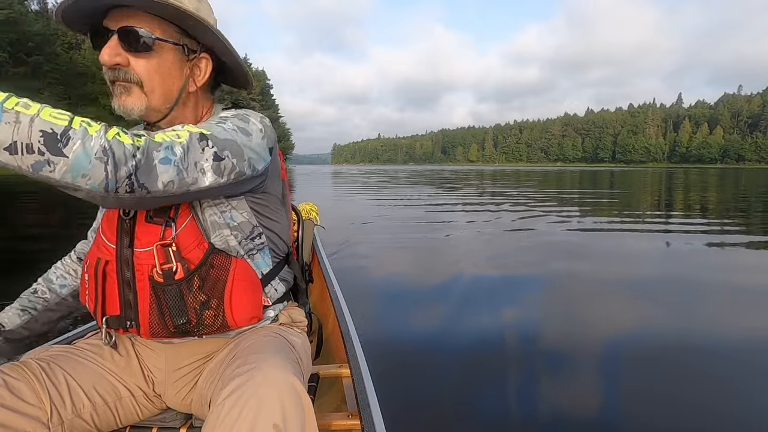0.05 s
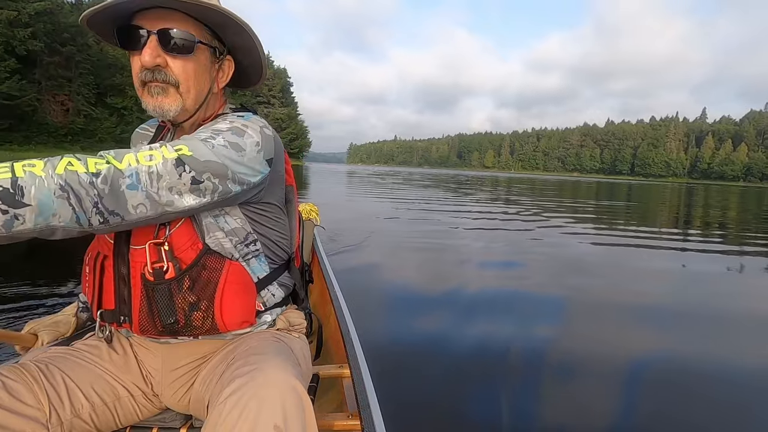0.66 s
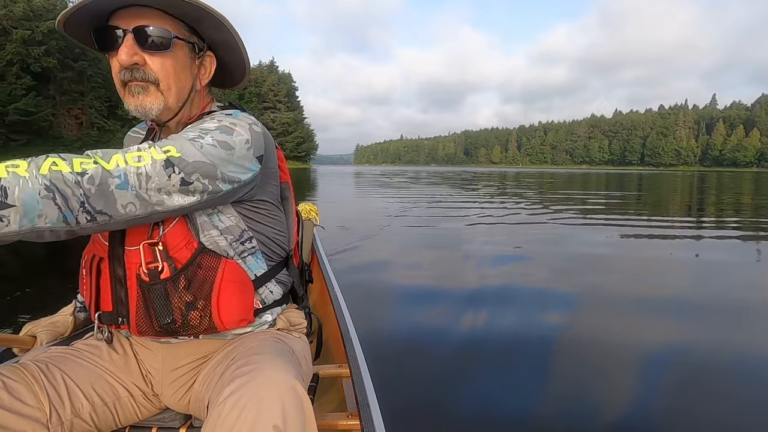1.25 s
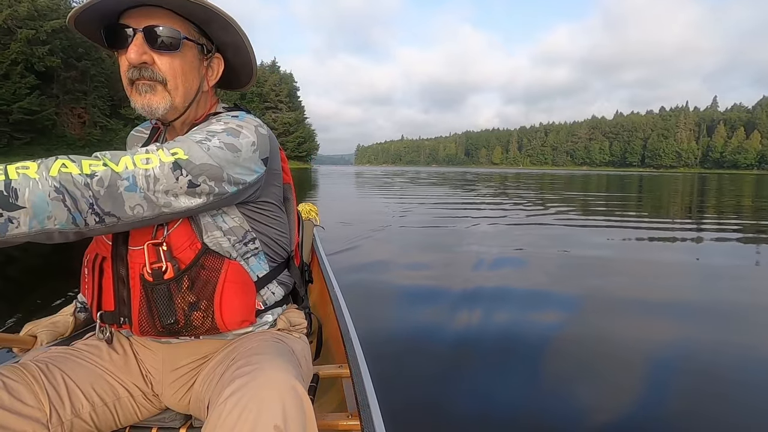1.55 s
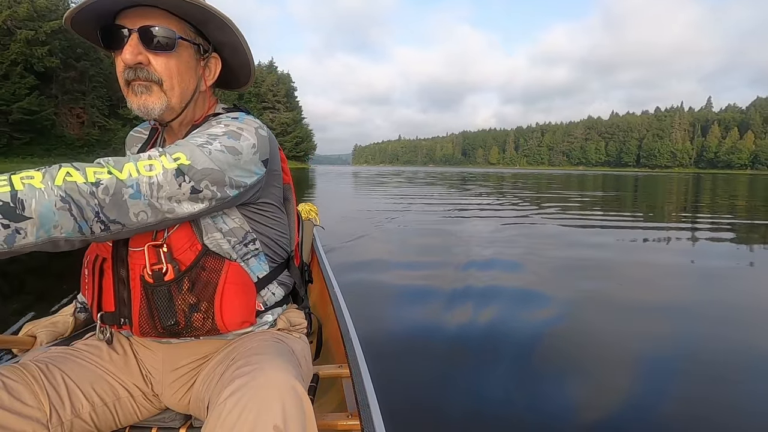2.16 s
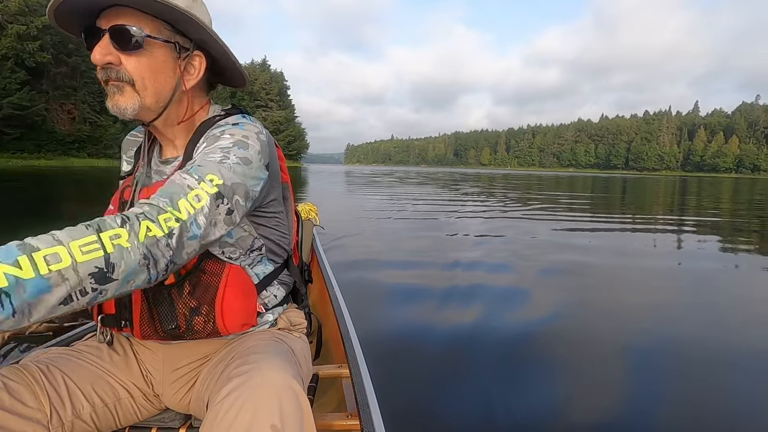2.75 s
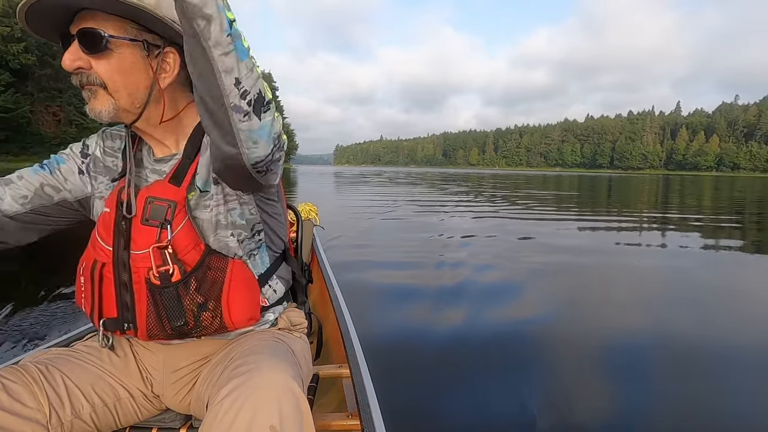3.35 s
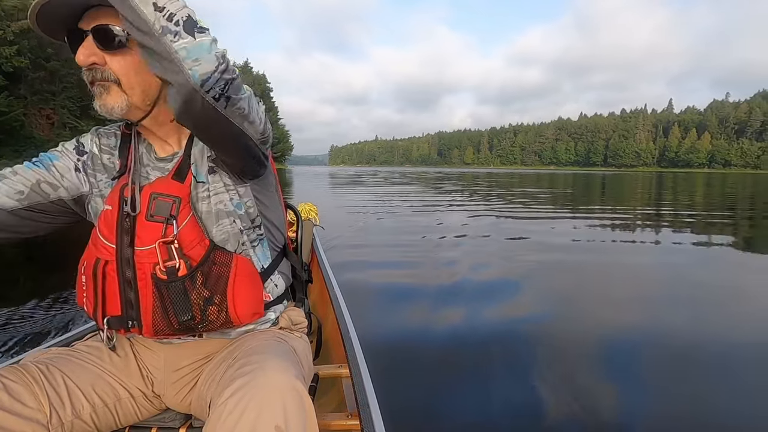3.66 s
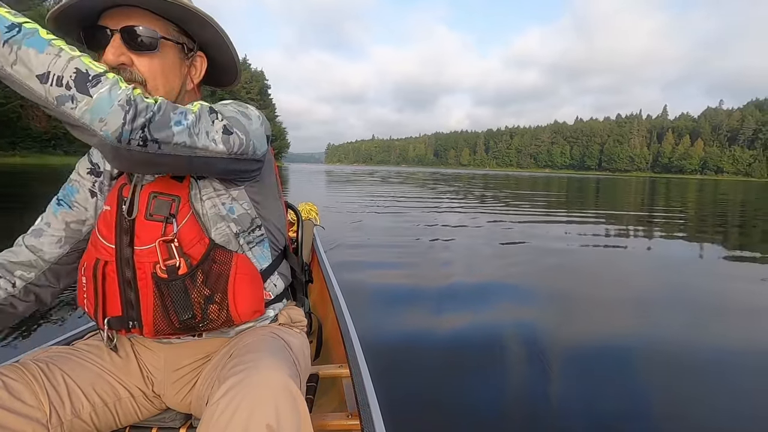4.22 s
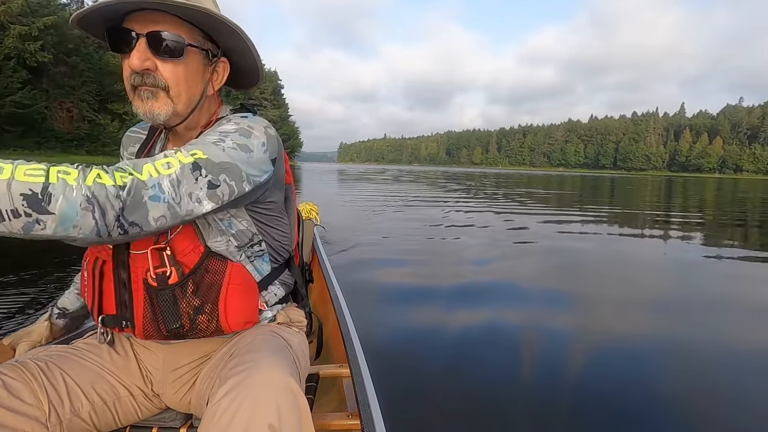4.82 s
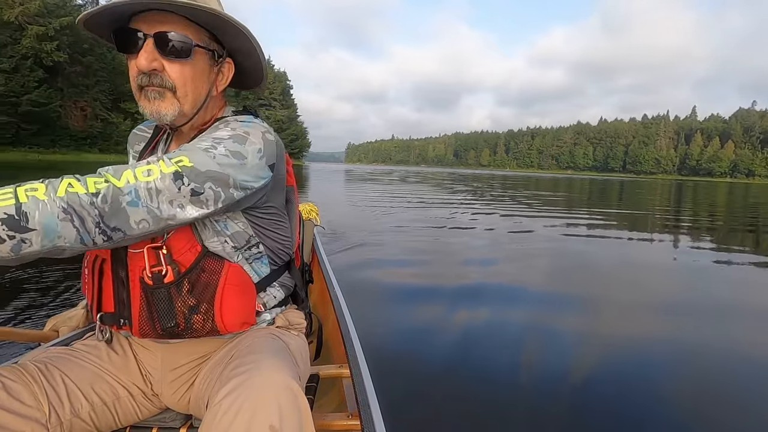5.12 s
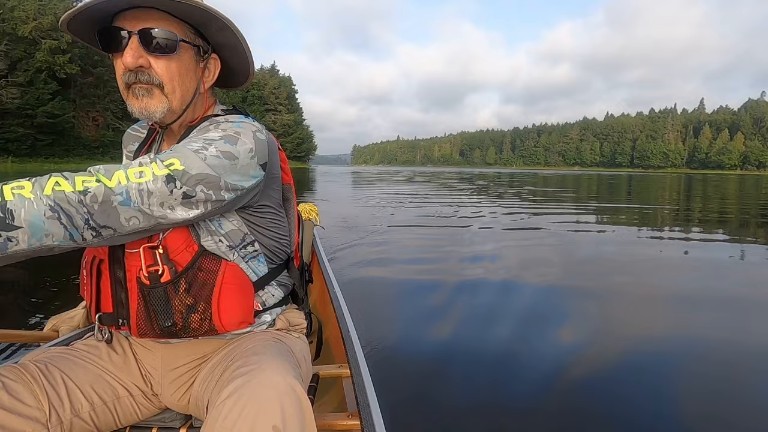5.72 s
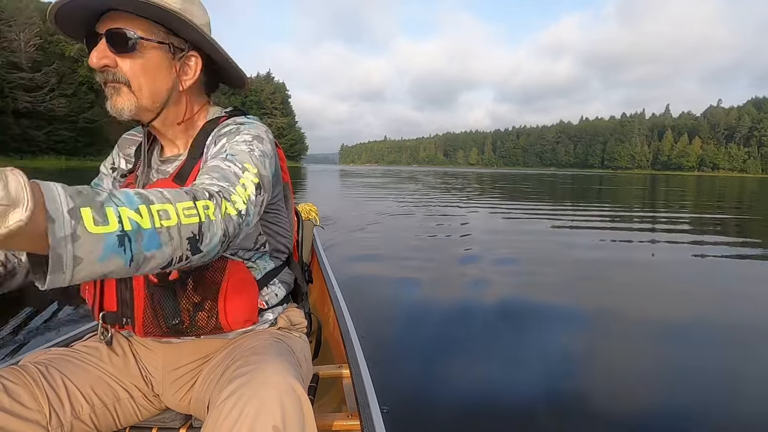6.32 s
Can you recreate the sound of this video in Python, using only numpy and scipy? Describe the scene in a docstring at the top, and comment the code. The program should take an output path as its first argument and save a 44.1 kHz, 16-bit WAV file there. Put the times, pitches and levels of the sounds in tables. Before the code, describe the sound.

A paddle swishes, drips and bumps a canoe on a quiet lake while birds sing from the shore.

```python
"""A calm lake, from inside a canoe: two slow paddle strokes.
The blade swishes through fine bubbles, its eddies gulp air, and its drips ring on the water.
The paddle sticks and slips, its shaft bumps the hull, and sleeves rustle as it swings forward.
Songbirds echo from the wooded shore on the left. Air puffs hit the microphone at the start and end."""
import sys
import numpy as np
from scipy import signal
from scipy.fft import rfft, irfft
from scipy.io import wavfile
from scipy.ndimage import uniform_filter1d

SR = 44100
rng = np.random.default_rng(int(sys.argv[2]) if len(sys.argv) > 2 else 0)


def inscribe(sig):
    """Save sig as 16-bit PCM at rate SR to the path in sys.argv[1].

    A 1-D sig is mono; a 2-D sig holds one channel per row.
    Samples are clipped to [-1, 1] before scaling.
    """
    pcm = np.round(np.clip(np.atleast_2d(sig).T, -1, 1) * 32767)
    wavfile.write(sys.argv[1], SR, pcm.astype(np.int16))


N = 285768
TIME_S = np.arange(N) / SR

# Noise spectra. Each row: frequency in Hz, relative level in dB.
AIR_SPECTRUM = [(20, -3), (60, -9.5), (110, -13.5), (160, 2.5), (250, -2.5), (500, -9), (800, -15),
                (1400, -12), (2600, -31), (4000, -33), (7500, -34.5), (10000, -39.5), (15000, -40)]
WIND_SPECTRUM = [(10, -8), (30, 0), (75, -1), (130, -11), (250, -28), (600, -45), (2000, -100)]
CLOTH_SPECTRUM = [(200, -10.5), (1000, 3), (2500, 3), (4000, -1.5), (6000, -0.5), (7800, -2), (9500, -10.5),
                  (12500, -16.5), (15000, -33)]
WASH_SPECTRUM = [(100, -14), (180, -14), (400, 2), (650, -4), (850, -5), (1300, -1.5), (2400, -3.5),
                 (3400, -2.5), (4500, -7), (7000, -12.5), (10000, -19.5), (15000, -39)]
SLOSH_SPECTRUM = [(25, -40), (70, -30), (120, -8), (160, 7.5), (300, -3), (550, -6), (800, -18),
                  (1500, -10), (4000, -65)]
TICK_SPECTRUM = [(150, -12), (700, 9), (1300, 8), (4000, 1.5), (7800, 0.5), (10000, -12), (15000, -21)]
# Left-right likeness. Each row: frequency in Hz, coherence from 0 to 1.
COHERENCE = [(40, .3), (160, 0.43), (600, 0.43), (1400, 0.61), (3000, 0.54), (7000, 0.43), (12000, 0.2)]

# Event levels below are taken before each layer's own gain and filtering.
# Wind at the microphone. Each row: start in seconds, length in seconds, left level in dB.
WIND_GUSTS = [(-.03, 0.16, -43), (1.0, 0.3, -60), (6.18, 0.1, -50), (6.375, 0.3, -23)]
# Eddies on the microphone. Each row: centre and width in seconds, left and right levels in dB.
AIR_PUFFS = [(0.053, 0.011, -26, -35), (6.449, 0.003, 5, -34), (6.463, 0.0015, -7, -17)]
# Arm movements. Each row: start in seconds, length in seconds, level in dB.
ARM_REACHES = [(-.15, 1.11, -57.5), (1.0, 0.29, -65), (2.33, 0.59, -61.5), (2.93, 0.27, -56),
               (3.08, 0.88, -54.5), (4.03, 1.27, -58), (4.58, 1.046, -57), (5.45, 0.46, -66.5),
               (6.13, 0.67, -68)]
# Blade moving through water. Each row: start, rise and hold in seconds, level in dB.
BLADE_SWISHES = [(0.04, 0.16, 0.18, -49.7), (1.09, 0.026, 0.084, -61), (2.854, 0.096, 0.032, -55.5),
                 (3.153, 0.034, 0.42, -57), (4.097, 0.55, 0.034, -52), (4.68, 0.046, 0.16, -46),
                 (5.18, 0.012, 0.036, -48.5), (5.318, 0.025, 0.13, -59.5), (5.817, 0.023, 0.13, -62),
                 (6.136, 0.0057, 0.0046, -57)]
# Water heaving by the hull. Each row: start in seconds, length in seconds, level in dB.
WATER_SURGES = [(.4, 0.52, -54), (1.08, 0.26, -48.5), (2.58, 0.18, -52.5), (4.68, 0.32, -56),
                (5.19, 0.16, -42.5), (5.35, 0.095, -39.5), (5.44, 0.27, -49.5), (5.72, 0.079, -42)]
# Drop splats and gear taps. Each row: start in seconds, level in dB, centre in Hz, decay in seconds.
SPLATS_AND_TAPS = [(0.082, -40.5, 2440, 0.0053), (0.21, -43.5, 4200, 0.0057), (.507, -43.5, 3580, 0.0028),
                   (.693, -38.5, 2000, 0.002), (.789, -47.5, 1980, .005), (.926, -46.5, 2540, 0.0079),
                   (1.002, -44, 2230, .005), (1.108, -35.5, 3300, 0.0024), (1.152, -40, 2400, 0.003),
                   (1.202, -45, 1300, 0.005), (1.456, -46.5, 2480, 0.0045), (1.509, -46.5, 2450, 0.0043),
                   (1.565, -47, 2390, 0.0044), (2.372, -41.5, 2350, 0.0036), (2.65, -42, 1700, 0.0048),
                   (3.003, -31, 4960, 0.0015), (3.057, -32, 11100, .0006), (3.0645, -33, 8000, .0007),
                   (3.072, -34, 8000, .0012), (3.231, -32.5, 4030, 0.00065), (3.265, -36, 7600, .0015),
                   (3.324, -38, 8000, .0012), (3.415, -39, 7500, 0.0018), (3.498, -38.5, 8000, 0.0035),
                   (3.541, -41, 6000, .0015), (3.596, -32, 5740, 0.00057), (3.739, -42.5, 1600, .005),
                   (4.072, -47.5, 3000, 0.0028), (4.103, -46.5, 1400, 0.0045), (4.6965, -26, 2500, 0.0029),
                   (4.72, -35, 1500, .0025), (4.803, -38, 1400, .002), (5.172, -39.5, 2320, .005),
                   (5.202, -35, 2200, .003), (5.245, -37, 3000, .004), (5.37, -36.5, 3000, .004),
                   (5.391, -30, 1990, 0.0022), (5.397, -32.5, 2900, 0.0023), (5.53, -34.5, 2620, 0.0029),
                   (5.558, -41.5, 3560, 0.0023), (5.999, -37.5, 3400, .004), (6.147, -38.5, 3700, 0.0063),
                   (6.248, -46, 10000, 0.001), (6.352, -47.5, 9000, .001)]
# Air swallowed by eddies. Each row: start and length in seconds, start and end pitch in Hz, level in dB.
EDDY_GULPS = [(0.098, 0.025, 1274, 2100, -46), (0.147, 0.029, 1580, 2510, -47),
              (.635, 0.052, 186, 189, -41.5), (0.694, 0.023, 1090, 1110, -42),
              (0.702, 0.01, 1370, 1510, -37), (0.713, 0.024, 565, 519, -34),
              (0.7885, 0.014, 1220, 1200, -38.5), (1.086, 0.029, 344, 322, -46.5),
              (1.117, 0.012, 203, 227, -45), (1.164, 0.03, 294, 337, -40), (1.198, 0.027, 300, 336, -39),
              (1.205, 0.12, 164.3, 193, -46), (1.208, 0.052, 495, 622, -48.5),
              (1.273, 0.031, 823, 1890, -48), (2.7, 0.059, 121, 78, -37.5),
              (2.961, 0.0079, 1490, 1350, -26), (3.96, 0.015, 171, 180, -44),
              (4.565, 0.023, 600, 530, -45.5), (4.758, 0.022, 557, 440, -39.5),
              (4.875, 0.078, 172, 148.5, -42.5), (5.21, 0.0095, 465, 366, -26.5),
              (5.223, 0.018, 332, 294, -32), (5.231, 0.0064, 1540, 1520, -32),
              (5.24, 0.0042, 1390, 990, -31), (5.2997, 0.0083, 537, 487, -29),
              (5.303, 0.013, 239, 215, -25), (5.363, 0.016, 297, 330, -31.5), (5.377, 0.011, 290, 225, -15),
              (5.388, 0.051, 305, 320, -30), (5.402, 0.075, 163.4, 141, -19), (5.402, 0.02, 710, 1370, -36),
              (5.421, 0.013, 893, 1490, -41.5), (5.536, 0.025, 194, 197, -32.5),
              (5.741, 0.036, 182, 192, -31.5), (5.756, 0.045, 420, 1430, -38.5),
              (5.755, 0.009, 1310, 1410, -35.5), (5.762, 0.031, 211, 235, -35),
              (5.764, 0.0058, 1400, 1620, -42), (5.799, 0.027, 241, 344, -28.5),
              (5.82, 0.019, 368, 502, -34.5), (5.821, 0.0086, 1490, 1590, -46),
              (5.836, 0.026, 594, 740, -32), (5.85, 0.0076, 1190, 1280, -38.5),
              (6.239, 0.011, 1300, 1110, -42)]
# Drops off the blade. Each row: start in seconds, start and end pitch in Hz, level in dB.
BLADE_DRIPS = [(0.126, 2290, 2230, -41.5), (.191, 2180, 2380, -37), (2.929, 1620, 1690, -40.5),
               (2.956, 2600, 2450, -35.5), (2.957, 4100, 3900, -39), (2.982, 2550, 2450, -41),
               (3.002, 2100, 1770, -31), (3.045, 8000, 9000, -41), (3.066, 6830, 9000, -32),
               (3.071, 1940, 2230, -38), (3.088, 3260, 5230, -37.5), (3.127, 5840, 7200, -40),
               (3.197, 3340, 7760, -27), (3.326, 5850, 8400, -31.5), (3.33, 4970, 6560, -32.5),
               (3.446, 6950, 7950, -25), (3.541, 4570, 4800, -36.5), (3.816, 3750, 4000, -35),
               (3.868, 1350, 1440, -44), (4.142, 2730, 3624, -36.5), (4.569, 2080, 2330, -37),
               (5.203, 2270, 2060, -30.5), (5.211, 4400, 4470, -34.5), (5.26, 2430, 2750, -33.5),
               (6.333, 5600, 6200, -41)]
# Paddle stick-slip. Each row: start and length in seconds, slips per second, first level in dB,
# centre in Hz.
SLIP_RUNS = [(0.2345, .095, 67, -29.5, 3000), (4.8724, .042, 85, -36, 1550)]
# One bird's thin rising whistle. Each row: start in seconds, level in dB.
BIRD_WHISTLES = [(0.495, -49.5), (0.815, -56), (1.125, -50.5)]
# Short bird chirps with little echo, and far fluting song. Each row: start and length in seconds,
# start, middle and end pitch in Hz, level in dB.
DRY_CHIRPS = [(1.045, 0.055, 8250, 8200, 8000, -55), (5.92, 0.089, 3130, 2740, 2540, -52.5),
              (6.017, 0.032, 2540, 3060, 2480, -49), (6.076, 0.042, 4600, 4420, 4770, -47),
              (6.116, 0.017, 4940, 5200, 4550, -54), (6.165, 0.027, 3770, 3950, 4300, -49)]
FAR_SONG = [(1.232, 0.053, 2240, 2280, 1800, -47.5), (1.382, 0.09, 2476, 2000, 1894, -43.5),
            (1.672, 0.055, 1830, 2200, 2310, -42.5), (1.718, 0.017, 2430, 3075, 3450, -36),
            (1.735, 0.025, 3470, 2707, 1830, -36), (1.847, 0.059, 2845, 2670, 2620, -38),
            (1.911, 0.026, 2620, 2283, 1530, -41), (2.017, 0.083, 1810, 2202, 2277, -40.5),
            (2.177, 0.067, 2617, 3020, 3110, -42), (2.228, 0.021, 2960, 3303, 2630, -33),
            (2.35, 0.062, 3147, 2900, 2666, -33.5), (2.425, 0.057, 2756, 2550, 2300, -38.5),
            (2.549, 0.029, 3170, 3990, 4870, -42.5), (2.597, 0.013, 4620, 4780, 4450, -39),
            (2.606, 0.016, 4460, 3930, 3100, -41), (2.631, 0.027, 2980, 3280, 3800, -45),
            (2.664, 0.0615, 4000, 3964, 3824, -40), (2.732, 0.06, 3370, 3340, 3360, -44),
            (2.804, 0.066, 5380, 5410, 5440, -52.5), (2.876, 0.082, 4790, 4510, 4510, -46),
            (6.19, 0.043, 2266, 2738, 2590, -43.5), (6.192, 0.042, 2450, 2185, 1390, -46.5),
            (6.3, 0.085, 2550, 2210, 2170, -38)]
# Leftward lean of the birds. Each row: frequency in Hz, left minus right in dB.
BIRD_LEAN = [(2000, 12), (3100, 14.5), (4400, 4.5), (7000, 4)]
# Shaft hitting the hull. Each row: start in seconds, level in dB, hardness as a cutoff in Hz.
SHAFT_BUMPS = [(1.486, -32, 220), (2.607, -31.5, 785), (2.612, -23, 496), (2.653, -17.5, 1400),
               (2.659, -22, 890), (2.666, -21.5, 720), (2.678, -26, 203)]
# Hull resonances. Each row: frequency in Hz, level in dB, time to fall 60 dB in seconds.
HULL_MODES = [(168.5, -1.5, 0.25), (205.2, 8, 0.134), (262, 14, 0.041), (342, 2.5, 0.082),
              (440, 3.5, 0.068), (565, -34, 0.056), (618, -2.5, 0.094), (1190, -10, 0.022),
              (1520, -1, 0.018)]
# Droplet showers. Each row: start and length in seconds, drops per second, lowest and highest pitch
# in Hz, reference level in dB.
DROPLET_SHOWERS = [(3.104, .55, 11.3, 3280, 8250, -42), (5.201, .068, 770, 1100, 5400, -41.5),
                   (5.39, .05, 260, 900, 4270, -52), (5.753, .14, 143, 650, 1610, -43.5)]

RIPPLE_DB = -68  # wash between swishes
DRIP_SWELL_SHARE = 0.082


def amp(db):
    """Decibels to gain."""
    return 10 ** (np.asarray(db) / 20)


def unit(x):
    """Scales to rms 1."""
    return x / np.sqrt(np.mean(x ** 2) + 1e-20)


def lookup(points, hz):
    """Interpolates on a log-frequency axis."""
    knots_hz, values = np.transpose(points)
    return np.interp(np.log(hz + 1), np.log(knots_hz + 1), values)


def pan(lean_db):
    """Stereo gains; positive leans left."""
    return amp(np.array([[lean_db], [-lean_db]]) / 2)


def add(mix, start_s, sound):
    """Mixes a sound in at start_s."""
    part = mix[:, max(round(start_s * SR), 0):][:, :sound.shape[-1]]
    part += sound[..., :part.shape[1]]


def noise():
    """Stereo white noise."""
    return rng.standard_normal((2, N))


def grains(per_s, spread_db):
    """Random clicks, most small, a few large."""
    sizes = amp(spread_db * np.minimum(rng.exponential(1, (2, N)), 4))
    return sizes * np.sign(noise()) * (rng.random((2, N)) < per_s / SR)


def jitter(samples):
    """Two smooth random curves, at most 0.25 s long."""
    white = rng.standard_normal((2, SR // 4))
    return unit(uniform_filter1d(uniform_filter1d(white, size=150), size=110))[:, :samples]


def highpass(x, cutoff_hz):
    """Third-order bass cut."""
    return signal.sosfilt(signal.butter(3, cutoff_hz, "highpass", fs=SR, output="sos"), x)


def coloured(drive, spectrum, band_hz=(0, SR / 2)):
    """Filters two unrelated signals into a partly coherent pair; mid has rms 1 in the band."""
    size = drive.shape[1]
    hz = np.fft.rfftfreq(size, 1 / SR)
    a, b = rfft(drive) * amp(lookup(spectrum, hz))
    coherence = np.clip(lookup(COHERENCE, hz), 0, 1)
    mid, side = a * np.sqrt(1 + coherence), b * np.sqrt(1 - coherence)
    in_band = irfft(mid * (hz >= band_hz[0]) * (hz <= band_hz[1]), size)
    return irfft([mid + side, mid - side], size) / (in_band.std() + 1e-12)


def patchy(x, depth_db):
    """Narrow bands swell and fade at random."""
    frames = signal.stft(x, nperseg=512)[2]
    field = rng.standard_normal(frames.shape[1:])
    field = uniform_filter1d(uniform_filter1d(field, size=7, axis=0), size=6, axis=1)
    return signal.istft(frames * amp(depth_db * unit(field)))[1][:, :N]


def humps(rows, peakedness, rest_db):
    """Envelope of one arch per movement over a resting level."""
    power = amp(rest_db) ** 2
    for start_s, length_s, db in rows:
        arch = abs(np.sin(np.pi * np.clip((TIME_S - start_s) / length_s, 0, 1)))
        power = power + (amp(db) * arch ** peakedness) ** 2
    return np.sqrt(power)


def echoes(x, delay_s, hold_s, t60_s, taps_per_s=2000):
    """Scattered reflections, level until hold_s, then decaying."""
    t = np.arange(SR) / SR
    taps = rng.standard_normal((2, SR)) * (rng.random((2, SR)) < taps_per_s / SR)
    taps *= (t > delay_s) * amp(-60 * np.maximum(t - hold_s, 0) / t60_s)
    taps /= np.linalg.norm(taps, axis=1, keepdims=True)
    return signal.fftconvolve(x, taps, axes=1)[:, :N]


def lake_air():
    """Faint steady hush of open air."""
    return amp(-59) * coloured(noise(), AIR_SPECTRUM)


def wind(calm_db=-73, drift_db=1.5):
    """Rumble, unrelated at the two microphone ports, and single eddies that push and suck."""
    hz = np.fft.rfftfreq(N, 1 / SR)
    drift = unit(sum(np.sin(2 * np.pi * (f * TIME_S + rng.random())) for f in np.geomspace(.4, 4, 12)))
    strength = humps(WIND_GUSTS, peakedness=2.2, rest_db=calm_db + drift_db * drift)
    rumble = unit(irfft(rfft(noise()) * amp(lookup(WIND_SPECTRUM, hz)), N))
    out = rumble * strength * amp([[0], [-9]])
    for centre_s, width_s, left_db, right_db in AIR_PUFFS:
        u = (TIME_S - centre_s) / width_s
        out += amp([[left_db], [right_db]]) * (1 - u ** 2) / (1 + u ** 2 / 3) ** 3
    return out * signal.windows.tukey(N, .001)


def sleeves():
    """Cloth fibres catch and slip in dense grains as the arms move."""
    fibres = unit(grains(per_s=4500, spread_db=3)) + 0.79 * noise()
    rub = coloured(patchy(fibres, depth_db=3), CLOTH_SPECTRUM, band_hz=(7500, 12000))
    return amp(-5) * pan(0.5) * humps(ARM_REACHES, peakedness=0.58, rest_db=-78) * rub


def stirring(settle_s=0.032, settle_per_hold=0.47):
    """Envelope of the blade's stirring; water settles more slowly after a long swish."""
    power = amp(RIPPLE_DB) ** 2
    for start_s, rise_s, hold_s, db in BLADE_SWISHES:
        age_s = TIME_S - start_s
        rise = np.clip(age_s / rise_s, 0, 1)
        settle = np.exp(-np.maximum(age_s - rise_s - hold_s, 0) / (settle_s + settle_per_hold * hold_s))
        power = power + (amp(db) * rise * settle) ** 2
    return np.sqrt(power)


def wash(bubbles_per_s=1500, decay_cycles=4.1, glide=0.019, pitches=20):
    """Tiny bubbles, each rising in pitch as it dies, over the hiss of parting water."""
    fizz = np.zeros((2, N))
    for hz in np.geomspace(1100, 8000, pitches):
        u = np.arange(int(4 * decay_cycles * SR / hz)) * hz / SR / decay_cycles
        ping = np.exp(-u) * np.sin(2 * np.pi * decay_cycles * u * (1 + glide * u / 2))
        births = grains(bubbles_per_s / pitches, spread_db=1.5)
        fizz += np.sqrt(hz) * signal.oaconvolve(births, ping[None])[:, :N]
    water = coloured(unit(fizz) + 0.88 * noise(), WASH_SPECTRUM, band_hz=(800, 1700))
    return amp(-1) * pan(3) * stirring() * water


def slosh():
    """Low churn of water heaving by the hull and pushed aside by the blade."""
    surge = humps(WATER_SURGES, peakedness=0.39, rest_db=-63.5)
    heave = np.hypot(surge, amp(-2) * stirring())
    return heave * coloured(patchy(noise(), depth_db=3.5), SLOSH_SPECTRUM)


def crests(per_s=200, decay_s=0.0027):
    """Small crests break during a swish, each a broadband snap."""
    decay = np.exp(-np.arange(512) / SR / decay_s)
    breaking = signal.oaconvolve(abs(grains(per_s, spread_db=3.5)), decay[None])[:, :N].mean(0)
    snaps = coloured(unit(breaking) * noise(), TICK_SPECTRUM)
    return amp(-3) * pan(-3) * np.maximum(stirring() - amp(RIPPLE_DB), 0) * snaps


def tick(centre_hz, decay_s, onset_share=0.5, focus_db_per_oct2=2.5):
    """Short noise burst, weighted toward centre_hz."""
    hz = np.geomspace(100, 16000, 24)
    age = np.arange(2048) / SR / decay_s
    envelope = (1 - np.exp(-age / onset_share)) * np.exp(-age)
    spectrum_db = lookup(TICK_SPECTRUM, hz) - focus_db_per_oct2 * np.log2(hz / centre_hz) ** 2
    burst = envelope * coloured(rng.standard_normal((2, len(age))), np.transpose([hz, spectrum_db]))
    return burst * np.linalg.norm(envelope) / envelope.max() / np.linalg.norm(burst.mean(0))


def splats_and_taps():
    """Single impacts of drops and gear, slightly left."""
    out = np.zeros((2, N))
    for start_s, db, centre_hz, decay_s in SPLATS_AND_TAPS:
        add(out, start_s, amp(db) * tick(centre_hz, decay_s))
    return amp(-1.5) * pan(2.5) * out


def bubble(length_s, swell_share, start_hz, end_hz, bend=1.157, ring_share=0.81, ragged_db=2):
    """Trapped air swells, glides faster as it nears the surface, and rings out unsteadily."""
    u = np.arange(0, 2 * length_s, 1 / SR) / length_s
    shake, heave = jitter(len(u))
    wobble = 0.049 * min(500 / start_hz, start_hz / 300, 1)  # mid-size pockets wobble most
    hz = start_hz * (end_hz / start_hz) ** (np.minimum(u, 1) ** bend)
    hz *= 1 + wobble * np.resize(shake, len(u))
    top = min(swell_share, .5)
    swell = np.minimum(u / top, 1) ** 0.5
    decay = np.exp(-(np.maximum(u - top, 0) / (ring_share * (1 - top))) ** 1.6)
    rough = amp(ragged_db * np.resize(heave - heave[0], len(u)) * np.minimum(u, 1))
    lean_db = 3 * min(start_hz / 1500, 1) ** 2  # long waves reach both sides alike
    return pan(lean_db) * swell * decay * rough * np.sin(2 * np.pi * np.cumsum(hz) / SR)


def gulps_and_drips(drip_cycles=13.5):
    """Eddies swallow air pockets and each drip traps a small bubble; the deep bass is cut from both."""
    out = np.zeros((2, N))
    for start_s, length_s, start_hz, end_hz, db in EDDY_GULPS:
        climb_oct = max(np.log2(end_hz / start_hz), 0)
        swell_share = 0.14 + 0.31 * climb_oct
        add(out, start_s, amp(db) * bubble(length_s, swell_share, start_hz, end_hz))
    for start_s, start_hz, end_hz, db in BLADE_DRIPS:
        add(out, start_s, amp(db) * bubble(drip_cycles / start_hz, DRIP_SWELL_SHARE, start_hz, end_hz))
    return highpass(out, cutoff_hz=100)


def stick_slip(jitter_s=0.0005, fade_db_per_s=-22):
    """The paddle sticks and slips during a pull: fading runs of nearly even ticks."""
    out = np.zeros((2, N))
    for start_s, length_s, per_s, db, centre_hz in SLIP_RUNS:
        for t in np.arange(0, length_s, 1 / per_s):
            slip = amp(db + fade_db_per_s * t) * tick(centre_hz, decay_s=0.0018)
            add(out, start_s + t + jitter_s * rng.standard_normal(), slip)
    return amp(-5.5) * pan(1.5) * out


def bird_note(length_s, start_hz, middle_hz, end_hz, db, quaver_hz=19, flutter_db=2.2, ramp_s=0.011):
    """Whistled glide that quavers and flutters, out of phase at the two ports."""
    u = np.linspace(0, 1, int(length_s * SR))
    quaver, flutter = jitter(len(u))
    glide_hz = np.polyval(np.polyfit([0, .5, 1], [start_hz, middle_hz, end_hz], 2), u)
    phase_rad = 2 * np.pi * np.cumsum(glide_hz + quaver_hz * quaver) / SR + np.array([[0], [2.07]])
    window = signal.windows.tukey(len(u), min(2 * ramp_s / length_s, .5))
    envelope = window * unit(amp(flutter_db * flutter))
    return pan(lookup(BIRD_LEAN, middle_hz)) * amp(db) * envelope * np.sin(phase_rad)


def birds(whistle_s=0.175, whistle_hz=(6130, 6430, 7410), foliage_cutoff_hz=6000):
    """Far song rings among the trees and echoes off the treeline; chirps and whistles echo less."""
    song, send, calls = np.zeros((3, 2, N))
    for start_s, length_s, start_hz, middle_hz, end_hz, db in FAR_SONG:
        note = bird_note(length_s, start_hz, middle_hz, end_hz, db)
        add(song, start_s, note)
        add(send, start_s, note / np.hypot(1, (middle_hz / foliage_cutoff_hz) ** 2))
    for start_s, *chirp in DRY_CHIRPS:
        add(calls, start_s, bird_note(*chirp))
    for start_s, db in BIRD_WHISTLES:
        add(calls, start_s, bird_note(whistle_s, *whistle_hz, db))
    send += amp(-8.5) * calls
    forest = echoes(send, delay_s=0.0056, hold_s=0.023, t60_s=0.77)
    treeline = echoes(send, delay_s=0.09, hold_s=0.09, t60_s=0.12)
    return amp(-3) * song + amp(-3.5) * calls + amp(-1.5) * forest + amp(-10.5) * treeline


def hull_bumps(contact_s=0.0006):
    """The shaft rings the hull; soft blows miss the high modes, and the deep bass is cut away."""
    out = np.zeros((2, N))
    t = np.arange(SR // 2) / SR
    for start_s, db, hardness_hz in SHAFT_BUMPS:
        ring = np.zeros(len(t))
        for hz, mode_db, t60_s in HULL_MODES:
            mode = amp(mode_db - 60 * t / t60_s) * np.sin(2 * np.pi * hz * t)
            ring += mode / np.hypot(1, hz / hardness_hz)
        ring *= 1 - np.exp(-t / contact_s)
        add(out, start_s, amp(db) * ring / abs(ring).max())
    return highpass(out, cutoff_hz=110)


def spray(cycles=11, glide_ratio=1.09, spread_db=8):
    """Droplets off the lifted or turning blade land at random, each a rising plink."""
    out = np.zeros((2, N))
    for start_s, length_s, per_s, low_hz, high_hz, db in DROPLET_SHOWERS:
        drops = rng.random((64, 3))[:round(length_s * per_s)]
        for k, (late, pitch, size) in enumerate(drops):
            hz = low_hz * (high_hz / low_hz) ** pitch
            plink = bubble(cycles / hz, DRIP_SWELL_SHARE, hz, hz * glide_ratio)
            add(out, start_s + (k + late) / per_s, amp(db + spread_db * (size - 1.5)) * plink)
    return out


def scene():
    """Paddle sounds with short reflections off the boat, plus water, sleeves, birds and air."""
    paddle = gulps_and_drips() + hull_bumps() + splats_and_taps() + stick_slip() + spray()
    boat = amp(-6.5) * echoes(paddle, delay_s=0.0032, hold_s=0.0025, t60_s=0.14).mean(0)
    return paddle + boat + wash() + crests() + slosh() + sleeves() + birds() + wind() + lake_air()


def record(dry):
    """Soft overload near full scale, then a low-pass."""
    cutoff_hz = 15250
    taps = signal.firwin(511, cutoff_hz, window=("kaiser", 9), fs=SR)
    return signal.oaconvolve(np.tanh(dry), taps[None], "same")


dry = scene()
out = record(dry)
inscribe(out)
```